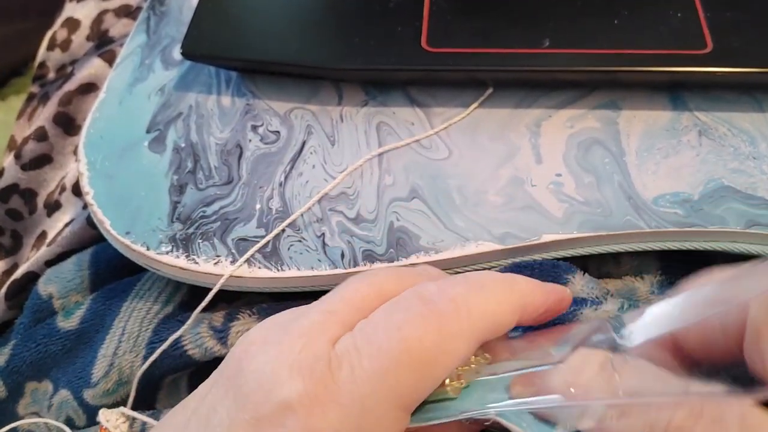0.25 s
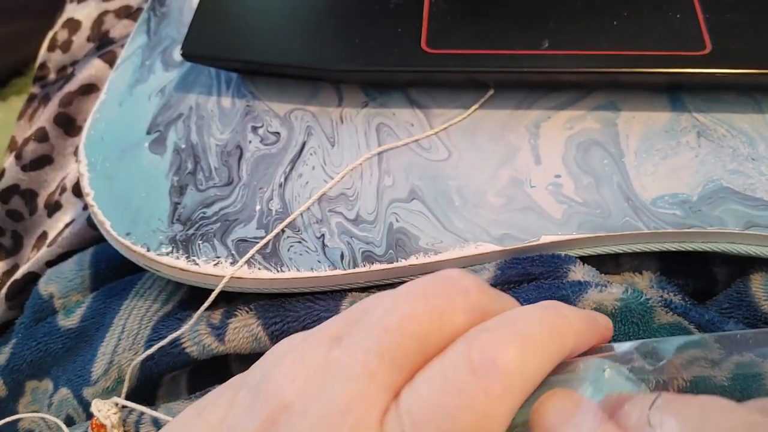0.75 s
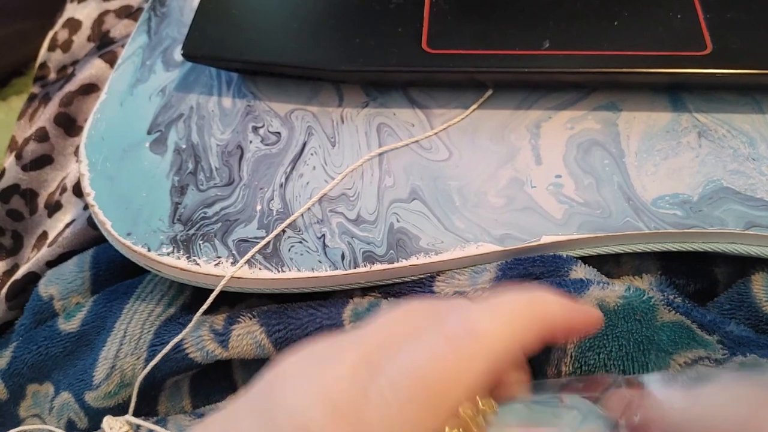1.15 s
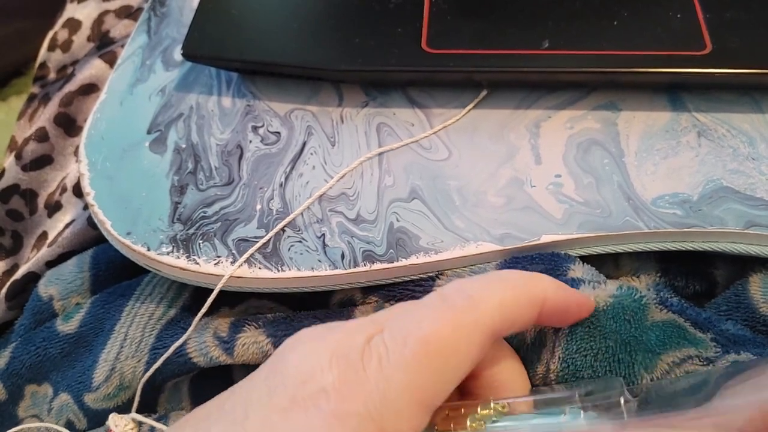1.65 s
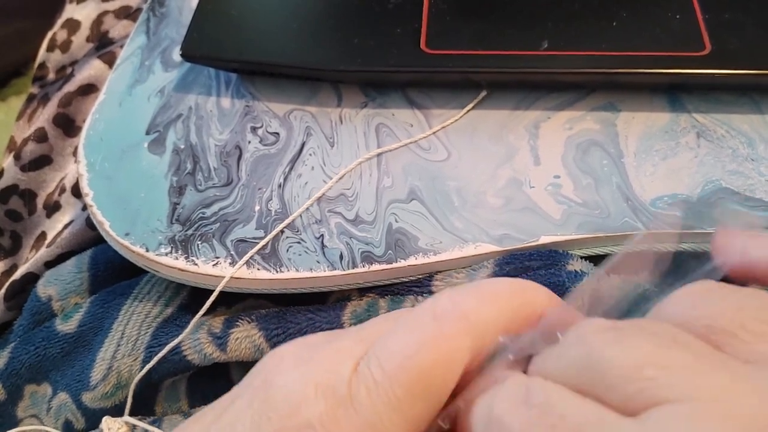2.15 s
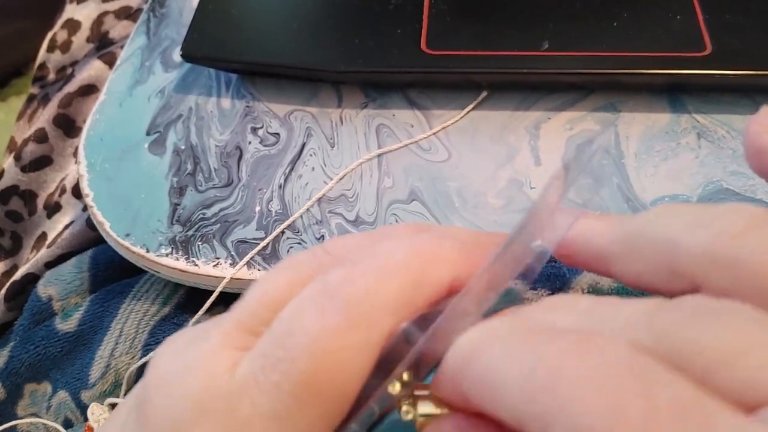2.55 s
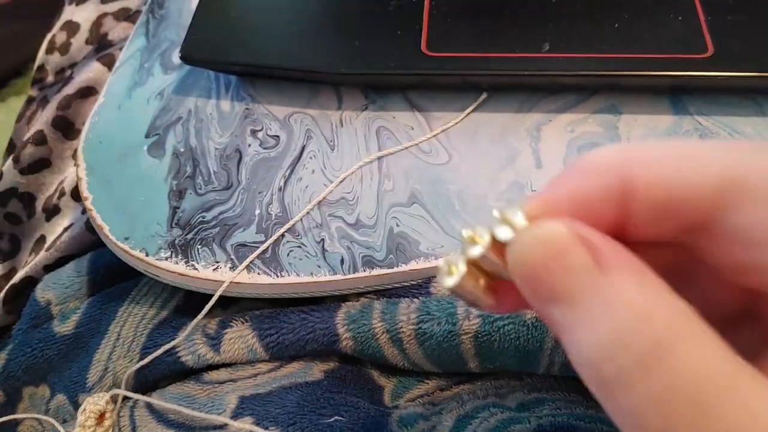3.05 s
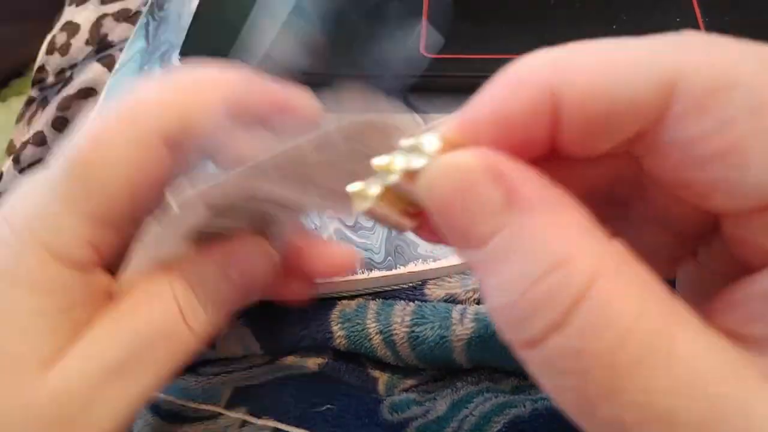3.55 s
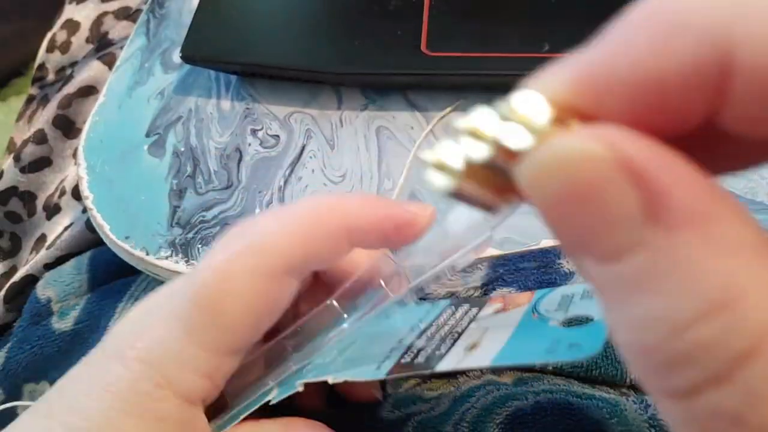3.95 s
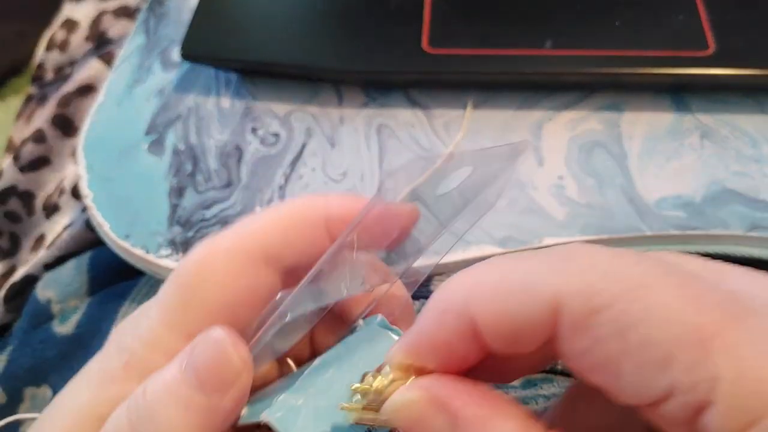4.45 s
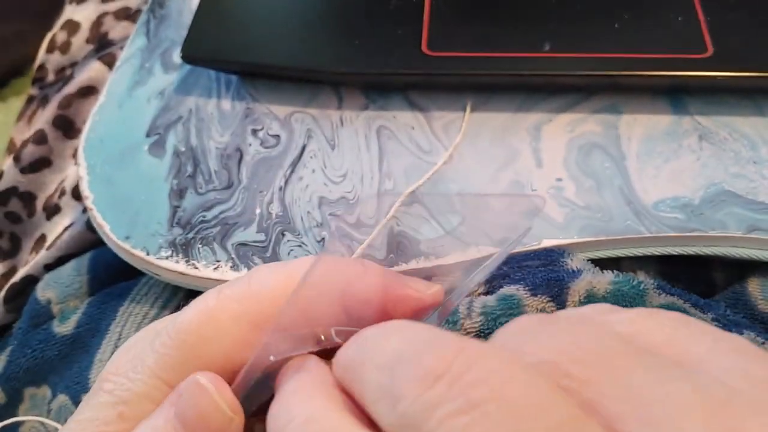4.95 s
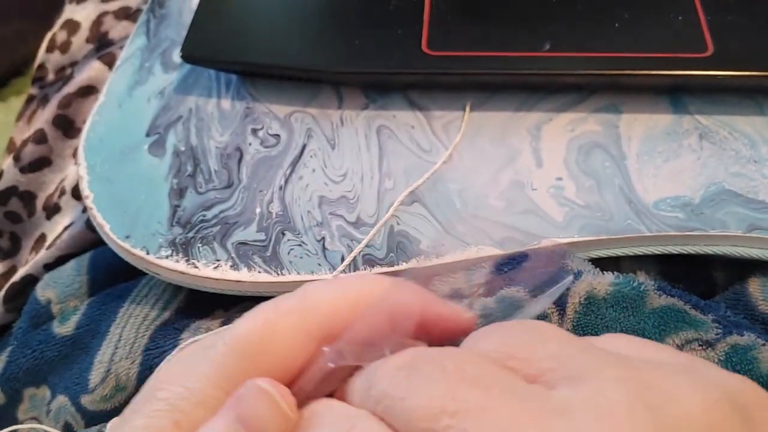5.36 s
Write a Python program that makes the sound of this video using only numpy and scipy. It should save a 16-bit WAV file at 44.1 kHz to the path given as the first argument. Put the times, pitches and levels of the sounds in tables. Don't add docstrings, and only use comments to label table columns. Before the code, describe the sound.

A close, dry stereo capture of hands working a stiff clear plastic sleeve in a quiet room, a faint wavering fan hum behind. It opens at once with a sharp crease snap, hissy finger rustle and fine ticks. From about 0.32 to 0.41 s a glued flap releases in a rapid ratchet of ticks with a tiny creak; a longer rising creak squeaks at 0.5-0.55. Hard snaps hit at 1.1 and, loudest and densest, around 1.3, with dull thumps and crunching. Further clusters come at 1.66-1.7, 2.3, 2.44 and 2.77-2.88, rustle between them. Around 3.0 small metal clasps give a very brief, bright tink at the left. Handling nearly stops until about 3.7, leaving fan hum and faint brushes. Then the clasps are pushed back in: softer rustles and small crackles, leaning left, one hard snap with a thump at 4.6, and busier crinkling from 5.2 to the end at about 5.6.

```python
import sys
import numpy as np
from scipy import signal
from scipy.fft import rfft, irfft, next_fast_len
from scipy.io import wavfile
from scipy.ndimage import uniform_filter1d, map_coordinates

SR = 44100
rng = np.random.default_rng(int(sys.argv[2]) if len(sys.argv) > 2 else 0)


def makeup_ratio(level_db):
    decades = np.asarray(level_db, float) / 20
    return 10 ** decades


def wav_out(sig):
    wavfile.write(sys.argv[1], SR, np.round(np.clip(np.atleast_2d(sig).T, -1, 1) * 32767).astype(np.int16))


N = 247401

# t/s, peak level/dB, colour f/Hz, thump level/dB, left over right level/dB
BIG_CREASES = [(.021, -11.5, 3730, -16, 0.5), (.2369, -27, 4120, -48, -6.5), (.4203, -17, 4250, -41, -3),
               (.4309, -12.5, 4730, -20, -3.5), (.6174, -22.5, 6600, -12, 4.5),
               (1.1115, -3.5, 10000, -10.5, 7), (1.1239, -16.5, 8400, -13, -4),
               (1.2485, -24.5, 2180, -22, 0), (1.261, -27, 4500, -22, -2.5),
               (1.2855, -29, 6400, -18.5, -2.5), (1.2993, 0.5, 7380, -12, 5),
               (1.3063, -2.5, 6400, -11.5, 6), (1.3076, -6.5, 2400, -6, 1.5),
               (1.3144, -26.5, 3600, -12, 4.5), (1.3253, -21, 1510, 1.5, 4.5), (1.343, -11, 3860, -9.5, 5),
               (1.6605, -16.5, 4270, -31, -3), (1.6628, -13, 3420, -16.5, 3), (1.6775, -21, 7600, -7, 2),
               (1.6984, -16, 5070, -25, 6), (1.6999, -27, 2350, -15.5, 1.5),
               (1.705, -15.5, 3000, -24.5, 8.5), (1.7102, -21, 3760, -5, 5.5),
               (2.298, -14.5, 6450, -16.5, -4.5), (2.2993, -12, 2760, -16, 2.5),
               (2.4356, -16, 7100, -40, 17), (2.4392, -5.5, 7400, -15.5, 1), (2.4403, -9, 6430, -4.5, 9.5),
               (2.7656, -15.5, 7900, -3.5, 8), (2.8357, -17, 2810, 0, 5.5), (2.8765, -19, 5840, -9.5, 2),
               (4.5928, -4.5, 7100, -31, 11), (4.5956, -13.5, 4220, -4, -3)]
# t/s, peak level/dB, colour f/Hz, left over right level/dB
DRY_TICKS = [(0.0422, -35, 2400, 10), (0.117, -24, 6400, 2), (0.2, -35, 4100, -4.5), (0.2202, -23, 6930, 1),
             (0.2237, -25, 6840, 4.5), (0.2304, -20.5, 6560, 9), (0.2416, -40, 6600, -14),
             (0.5554, -27.5, 4700, 3), (0.5617, -23.5, 4800, 7), (0.6775, -32.5, 4360, -8),
             (0.8013, -34, 7760, 5), (0.806, -45, 5000, 11), (0.8933, -38.5, 4700, 18),
             (0.9751, -26.5, 8400, 7), (0.9838, -37.5, 8200, 9), (1.008, -38, 5200, 5),
             (1.0337, -40, 5000, 9), (1.054, -28, 5280, 5), (1.09, -32, 3000, 10), (1.0983, -31.5, 5100, 8),
             (1.2727, -30.5, 8100, 12), (1.3298, -21.5, 6200, -14), (1.5589, -35, 3980, 7),
             (1.671, -15.5, 3610, -3), (1.8427, -44, 3020, 5), (1.9424, -29, 3000, 16),
             (1.9758, -27, 6400, 2.5), (2.0006, -44, 6840, 6), (2.3238, -25, 8100, 4),
             (2.6576, -39.5, 1680, 13), (2.6658, -30.5, 1750, 11), (2.6747, -29.5, 1600, 7.5),
             (2.7633, -18.5, 6100, 13), (2.8056, -27, 6800, 8.5), (2.818, -29, 6600, 11),
             (2.832, -13.5, 4800, 4.5), (2.8896, -34, 6200, 12.5), (3.7387, -41, 7000, 13.5),
             (4.2128, -48.5, 6230, 14), (4.4061, -38.5, 3430, 4), (4.4449, -38, 2340, 10),
             (4.5944, -7.5, 4280, 25), (4.813, -59, 8200, 13), (4.9566, -45, 2520, -2),
             (5.0092, -39.5, 2830, 17), (5.207, -39, 2540, 10), (5.2726, -30, 7960, 9),
             (5.3178, -28.5, 7150, 20), (5.3802, -29.5, 5150, -4)]
# f/Hz, level/dB per Hz
FILM_COLOUR = [(300, -12), (1200, 0), (2500, 0), (3500, -1), (5000, 0), (8300, 3), (9300, -7), (10200, -5),
               (11600, -0.5), (12300, -6.5), (12900, -18.5), (15400, -13), (16200, -41.5), (17000, -75.5)]


def unit(x):
    return x / np.sqrt(np.mean(x ** 2, axis=-1, keepdims=True) + 1e-20)


def along(points, hz):
    f, v = np.transpose(points)
    return np.interp(np.log(hz + 1), np.log(f + 1), v)


def wobble(rate):
    knots = rng.standard_normal(int(N * rate / SR) + 4)
    return map_coordinates(knots, [np.arange(N) * rate / SR])


def filtered(x, response):
    m = next_fast_len(x.shape[-1] + 2048)
    spectrum = rfft(x, m) * response(np.fft.rfftfreq(m, 1 / SR))
    return irfft(spectrum, m)[..., :x.shape[-1]]


def peak(hz, centre_hz, width_hz):
    return 1j * hz * width_hz / (centre_hz ** 2 - hz ** 2 + 1j * hz * width_hz)


def pair(shape, alike):
    a, b = rng.standard_normal((2, *shape))
    share = np.clip(alike, 0, 1)
    return np.array([a, share * a + np.sqrt(1 - share ** 2) * b])


def clumps(shape, depth_db, size):
    steps = rng.exponential(size=(*shape[:-1], shape[-1] // size + 1))
    held_steps = np.repeat(steps, size, axis=-1)[..., :shape[-1]]
    return makeup_ratio(depth_db * held_steps)


def film(x, colour_hz, sharpness):
    spread = .5 * rng.standard_normal((len(colour_hz), 4)) / np.sqrt(sharpness)
    rings_hz = colour_hz * np.exp(spread)

    def patch(hz):
        rings = 1.5 * sum(peak(hz, c[:, None], 160) for c in rings_hz.T)
        return 0.57 / sharpness + peak(hz, colour_hz, colour_hz / sharpness) * (1 + 1.8 * rings)

    return unit(filtered(x, lambda hz: makeup_ratio(along(FILM_COLOUR, hz)) * peak(hz, 5400, 48000) ** 4 * patch(hz)))


def sheet(x):
    return unit(filtered(x, lambda hz: peak(hz, 710, 1400) * peak(hz, 330, 1000)))


def laid_out(rows, starts):
    out = np.zeros((2, SR + N + rows.shape[-1]))
    for k, s in enumerate(starts):
        first = SR + round(s * SR)
        out[:, first:first + rows.shape[-1]] += rows[:, k]
    return out[:, SR:SR + N]


def creases():
    # t/s, peak level/dB, colour f/Hz, thump level/dB
    opening = [(0.0631, -27.5, 3840, -31), (0.109, -26.5, 6930, -29), (0.1191, -29, 1050, -37),
               (0.1762, -30.5, 3990, -42), (0.25, -26.5, 6400, -40), (0.546, -28, 7800, -30),
               (0.6958, -44, 5100, -25), (0.7194, -47, 5540, -14), (0.7927, -36.5, 5500, -31),
               (1.0173, -29.5, 7000, -14.5), (1.064, -25, 5890, -44), (1.3717, -20, 8200, -15),
               (1.4434, -23, 9170, -12.5), (1.535, -31.5, 6600, -2.5), (1.563, -28, 3240, -34),
               (1.607, -23, 5900, -6.5), (1.8493, -39.5, 2930, 6), (1.9814, -29.5, 5720, -7.5),
               (2.3417, -25, 7600, -25), (2.3525, -24, 9030, -12), (2.6424, -36, 3990, -25),
               (2.6591, -28.5, 2020, -5), (2.777, -35, 7620, -18), (2.927, -38, 7300, -13)]
    # t/s, peak level/dB, colour f/Hz, thump level/dB
    repacking = [(3.7317, -38, 6800, -3), (3.919, -34, 7000, -13.5), (3.9636, -35, 2160, -5),
                 (4.0342, -22.5, 2590, -17.5), (4.3171, -30, 5430, -10), (4.347, -38.5, 6080, -36.5),
                 (4.4013, -47.5, 2420, -10), (4.492, -34, 2950, -24), (4.58, -35, 4400, -10),
                 (4.65, -29.5, 4300, -19), (4.8006, -29.5, 8150, -16), (4.8179, -37, 7060, -40),
                 (4.862, -36, 6560, -17.5), (4.9373, -22.5, 2330, -11), (5.1045, -34, 7650, -11),
                 (5.1625, -38.5, 2300, -3.5), (5.2206, -45, 2600, -19), (5.2414, -25, 2540, -0.5),
                 (5.273, -26.5, 1600, -24), (5.3074, -27, 7000, -22), (5.3128, -36, 7900, -21.5),
                 (5.383, -22, 7270, -15), (5.39, -24, 7460, -12), (5.4154, -21, 6300, -9)]
    opening_pan_db, repacking_pan_db = 2, 8.5
    tick_thump_db = -21.5
    small = [(*r, opening_pan_db) for r in opening] + [(*r, repacking_pan_db) for r in repacking]
    dry_ones = [(s, db, hz, tick_thump_db, pan) for s, db, hz, pan in DRY_TICKS]
    return BIG_CREASES + small + dry_ones


def snaps():
    crack_hz, crack_db, crack_grows = 11060, -5.5, 0.24
    tick_sharp, tick_tail_db = 1.8, -2
    s, peak_db, colour_hz, thump_db, pan_db = (c[:, None] for c in np.transpose(creases()))
    index = np.arange(len(s))[:, None]
    lead = .012
    t = np.arange(SR // 9) / SR - lead
    after = np.maximum(t, 0)
    shape = (len(s), len(t))

    creep = makeup_ratio(-16.5 + 60 * np.minimum(t, 0) / 0.0035) * (t < 0)
    span = 0.00031 * makeup_ratio(0.042 * (peak_db + 25.0))
    rise = ((t - .0005) / span) ** 2
    fall = ((t - .0005) / (3.47 * span)) ** 2
    burst = np.exp(-np.where(t < .0005, rise, fall))
    thump = (after / (1.53 * span)) * np.exp(1 - after / (1.524 * span))
    decay = makeup_ratio(-12 - 60 * after / 0.035) + makeup_ratio(-25 - 60 * after / 0.17)
    scatter = (1 - np.exp(-after / 0.0015)) * decay

    slack = np.clip(5200 / colour_hz, 1, 3) ** (1.33 * (index >= len(BIG_CREASES)))
    taut = np.where(index < len(s) - len(DRY_TICKS), 1, tick_sharp)
    high = film(pair(shape, alike=0.074), colour_hz, sharpness=1.5 * slack * taut)
    crack = film(pair(shape, alike=0.11), np.full_like(colour_hz, crack_hz), sharpness=1.9)
    high = (high + makeup_ratio(crack_db + crack_grows * (peak_db + 16.5)) * crack / slack) * burst
    high /= np.sqrt(np.max(uniform_filter1d(high ** 2, size=30), axis=-1, keepdims=True))

    push = 3 * (1 - after / (0.77 * span)) * np.exp(-after / (0.41 * span)) * np.tanh(after / 0.00044)
    low = makeup_ratio(thump_db) * (sheet(pair(shape, alike=0.044)) * (thump + scatter) + push)
    tail = film(pair(shape, alike=0.062), colour_hz, sharpness=0.1 * slack ** 2) * (scatter + creep)
    tail[:, -len(DRY_TICKS):] *= makeup_ratio(tick_tail_db)
    side = np.array([0 * pan_db, 1.5 - pan_db])
    dull = lambda hz: 1 / (1 + 1j * hz * (slack - 1) / 9000) ** 2
    rows = makeup_ratio(peak_db - 6.0) * (makeup_ratio(side) * (high + low) + tail)
    return laid_out(filtered(rows, dull), s[:, 0] - lead)


def crunches():
    # t/s, length/s, level/dB, colour f/Hz, thump level/dB
    dense_runs = [(0.0, 0.034, -38, 4190, -7), (0.099, 0.026, -40, 3440, -16),
                  (0.662, 0.021, -30.5, 5500, -18.5), (0.838, .016, -33.5, 6160, -46),
                  (1.093, 0.03, -43.5, 4890, -4.5), (1.291, .012, -30.5, 5980, -4),
                  (1.309, 0.045, -25, 2413, -2.5), (1.653, .008, -41, 3050, -22),
                  (1.656, .024, -27.5, 3420, -16), (1.695, .015, -26.5, 2840, -21),
                  (2.298, 0.03, -36, 5920, -10), (2.763, 0.018, -35, 5940, -10),
                  (2.797, 0.044, -43, 7120, -24), (2.828, 0.014, -36.5, 5780, -5),
                  (4.603, 0.02, -39, 7400, -3), (4.639, 0.0205, -43.5, 3396, -8.5),
                  (5.216, 0.077, -48, 3225, -5), (5.236, 0.025, -38.5, 1725, -2.5),
                  (5.412, .013, -46.5, 5460, -12)]
    # t/s, length/s, level/dB, colour f/Hz
    squeaks = [(0.829, 0.023, -48, 1200), (1.924, 0.034, -43, 2720), (2.587, 0.048, -50.5, 2460),
               (4.478, 0.015, -46, 2800), (5.2, 0.011, -45, 2500), (3.8, 0.028, -58, 1980),
               (0.04, 0.024, -47, 1550)]
    crunch_sharp, squeak_sharp, squeak_thump_db = .65, 4.5, -24
    rows = [(*r, crunch_sharp) for r in dense_runs]
    rows += [(*r, squeak_thump_db, squeak_sharp) for r in squeaks]
    s, length, level_db, colour_hz, thump_db, sharpness = (c[:, None] for c in np.transpose(rows))
    t = np.arange(SR // 5) / SR
    shape = (len(s), len(t))
    run = (1 - np.exp(-t / 0.0016)) * makeup_ratio(-5 * t / length) / (1 + (t / length) ** 12)
    trail = makeup_ratio(-19.5 - 60 * np.maximum(t - length, 0) / 0.11) * (t > length / 2)
    slips = unit(clumps(shape, depth_db=2.0, size=40))
    high = film(pair(shape, alike=0.2), colour_hz, np.maximum(sharpness, .3)) * (slips * run + trail)
    low = makeup_ratio(thump_db) * sheet(pair(shape, alike=0.26)) * (run + trail)
    return laid_out(makeup_ratio(level_db) * (high + low), s[:, 0])


def grains(count, life_s):
    start, pitch, size = rng.random((3, count, 1))
    k = np.arange(120)
    tone = np.sin(2 * np.pi * (1200 + 14000 * pitch) * k / SR)
    ring = tone * np.exp(-k / SR / life_s) * (1 - np.exp(-k / 8))
    ring = ring * makeup_ratio(-2.6 * np.log(size + 1e-2))
    places = (start * N).astype(int) + k
    return unit(np.bincount(places.ravel(), ring.ravel(), N + len(k))[:N])


def strokes(t):
    # t/s, swell/s, fade/s, peak level/dB, patch f/Hz
    pulls = [(0.0, 0.06, 0.32, -42.5, 3240), (.239, 0.077, 0.031, -36.5, 6150),
             (.313, 0.054, 0.028, -43, 6550), (.445, 0.2, 0.19, -40.5, 4800),
             (.535, 0.069, 0.03, -31.5, 9700), (0.676, 0.1, 0.034, -36.5, 5740),
             (.846, 0.1, 0.12, -47.5, 4800), (.99, 0.056, 0.22, -53.5, 7740),
             (1.06, 0.015, 0.099, -39.5, 5550), (1.134, 0.093, 0.03, -38.5, 4900),
             (1.265, 0.022, 0.16, -32, 12900), (1.564, 0.1, 0.053, -40.5, 3800),
             (1.716, 0.14, 0.057, -42.5, 2230), (1.821, 0.59, 0.19, -53, 2630),
             (1.942, 0.026, 0.12, -44.5, 7100), (2.078, 0.08, 0.021, -38.5, 8400),
             (2.222, 0.031, 0.074, -56, 6470), (2.29, 0.03, 0.03, -53.5, 6800),
             (2.354, 0.11, .022, -38.5, 9570), (2.443, 0.023, 0.05, -35, 4770),
             (2.638, 0.15, 0.11, -42, 6900), (2.839, 0.16, 0.1, -37.5, 7000),
             (3.013, 0.029, 0.04, -61, 11960)]
    # t/s, swell/s, fade/s, peak level/dB, patch f/Hz
    pushes = [(3.3, 0.056, .03, -69.5, 4000), (3.381, .012, .03, -52.5, 4040),
              (3.443, 0.0054, .08, -64.5, 8200), (3.51, 0.13, .016, -60, 11500),
              (3.553, 0.0055, .018, -55.5, 5000), (3.625, 0.0082, 0.15, -50, 7000),
              (3.722, 0.008, .16, -48, 8200), (3.919, 0.06, .1, -57, 7140), (4.033, 0.14, .05, -44.5, 3930),
              (4.21, .03, 0.27, -52.5, 7200), (4.363, 0.14, 0.046, -50.5, 5590),
              (4.492, 0.035, 0.053, -44.5, 7000), (4.598, 0.038, .07, -36.5, 8840),
              (4.724, .05, .2, -52.5, 3600), (4.863, 0.1, .087, -47, 6565), (4.956, 0.03, .1, -52.5, 4300),
              (5.01, .05, .07, -51, 7490), (5.065, .03, .03, -52.5, 6840), (5.12, .03, .04, -59, 5000),
              (5.17, .03, .05, -59.5, 5000), (5.254, 0.067, .08, -36, 9300),
              (5.385, 0.025, .064, -48, 9560), (5.504, 0.039, 0.055, -44, 6570),
              (5.535, 0.07, 0.052, -40.5, 6600), (5.608, 0.125, .1, -51, 7000)]
    still_db, roundness = -77, 1.08
    s, swell, fade, peak_db, patch_hz = (c[:, None] for c in np.transpose(pulls + pushes))
    distance = np.abs((t - s) / np.where(t < s, swell, fade))
    each_db = peak_db - 20 * distance ** roundness
    effort_db = 10 * np.log10(np.sum(makeup_ratio(each_db) ** 2, axis=0) + makeup_ratio(still_db) ** 2)
    return effort_db, patch_hz[each_db.argmax(axis=0), 0]


def rustle():
    # t/s, left over right level/dB
    hands_pan = [(0, -5.5), (.9, -1), (1.6, -1), (2.5, 3.5), (3.5, 5.5), (5.6, 4)]
    bright_db, brighter = -1.5, 0.083
    drag = unit(pair((N,), alike=0.071) * clumps((N,), depth_db=2.4, size=30))
    z = signal.stft(makeup_ratio(-4.0) * drag + grains(count=40000, life_s=0.0014), nperseg=256)[2]
    field = uniform_filter1d(rng.standard_normal(z.shape[1:]), size=3, axis=0)
    field = uniform_filter1d(field, size=22, axis=1)
    hz = np.linspace(1, SR / 2, len(z[0]))[:, None]
    frames = np.arange(z.shape[2]) * 128 / SR
    level_db, patch_hz = strokes(frames)

    tilt_db = (bright_db + brighter * (level_db + 50.5)) * np.clip(np.log2(hz / 5000), -3, 2)
    colour_db = along(FILM_COLOUR, hz) + tilt_db
    ringing = 1 + 2.2 * np.abs(peak(hz, patch_hz, 500))
    gain = makeup_ratio(colour_db) * ringing * hz ** 2 / (hz ** 2 + 1100 ** 2)
    gain = gain / np.sqrt(np.mean(gain ** 2, axis=0))
    hiss = unit(signal.istft(z * gain * makeup_ratio(4.0 * field / field.std()), nperseg=256)[1][:, :N])

    t = np.arange(N) / SR
    pan_db = np.interp(t, *np.transpose(hands_pan))
    effort_db = np.interp(t, frames, level_db) - 5.5 + 3.2 * wobble(40)
    return makeup_ratio(effort_db) * makeup_ratio([0 * pan_db, -pan_db]) * hiss


def notches():
    # t/s, peak level/dB
    releases = [(0.319, -27), (0.328, -20), (0.343, -21.5), (0.3589, -26.5), (0.3662, -19.5),
                (0.3746, -21.5), (0.3844, -24), (0.3934, -21), (.4007, -22.5), (0.4113, -20.5)]
    flap_hz, flap_width_hz, ring_t60_s, pop_level = 7000, 12000, 0.0094, 0.63
    s, peak_db = np.transpose(releases)
    t = np.arange(SR // 50) / SR
    flap = lambda hz: makeup_ratio(along(FILM_COLOUR, hz)) * peak(hz, flap_hz, flap_width_hz) ** 2
    ring = unit(filtered(pair((len(s), len(t)), alike=.2), flap))
    ring = ring * makeup_ratio(-60 * t / ring_t60_s) * (1 - np.exp(-t / 0.00051))
    has_pop = np.abs(s[:, None] - .36) < .038
    pop = pop_level * np.exp(-((t - .0003) / .00009) ** 2) * has_pop
    return laid_out(makeup_ratio(peak_db)[:, None] * np.array([ring[0] + pop, ring[1]]), s)


def creaks():
    # t/s, rate/slips per s, level/dB
    slides = [
        [(.303, 460, -47), (.311, 430, -41), (.317, 370, -33), (.318, 400, -47)],
        [(.49, 365, -58), (.5, 540, -33.5), (.51, 425, -26.5), (.525, 700, -32.5), (.535, 1210, -35),
         (.548, 870, -38), (.552, 1700, -61)],
    ]
    # f/Hz, width/Hz, level/dB
    fold_rings = [(1600, 700, -8.5), (4800, 710, -2), (6400, 280, -3.5), (9900, 740, -1)]
    t, slips = np.arange(N) / SR, np.zeros(N)
    for rows in slides:
        s, rate, level_db = np.transpose(rows)
        pace = np.interp(t, s, rate, left=0, right=0) * (1 + .13 * wobble(300))
        passed = np.floor(np.cumsum(pace) / SR)
        slip_db = np.interp(t, s, level_db) + 1.3 * rng.standard_normal(N)
        slips += np.diff(passed, prepend=0) * makeup_ratio(slip_db)
    blur = makeup_ratio(-25 - 60 * t[:SR // 40] / .02) * pair((SR // 40,), alike=.3)
    blur[:, 0] = 1

    def fold(hz):
        rings = sum((-1) ** k * makeup_ratio(db) * peak(hz, c, w) for k, (c, w, db) in enumerate(fold_rings))
        return makeup_ratio(along(FILM_COLOUR, hz)) * peak(hz, 2400, 30000) ** 2 * rings

    return makeup_ratio(32.0) * filtered(signal.fftconvolve(slips[None], blur, axes=1)[:, :N], fold)


def panels():
    # t/s, length/s, level/dB, ring f/Hz
    bends = [(0.016, 0.015, -32, 3690), (0.223, 0.016, -35, 4100), (4.935, 0.0074, -41, 2420),
             (1.3, .008, -24, 2453), (1.524, 0.017, -49, 2595), (1.558, 0.026, -53, 1695),
             (1.657, 0.016, -24, 3820), (1.696, 0.0066, -27.5, 2370), (2.295, 0.011, -31, 2695),
             (2.297, 0.0084, -33, 4260), (2.437, 0.011, -29, 6425), (3.915, 0.0083, -51.5, 2420),
             (3.937, 0.063, -62, 4100), (3.937, 0.076, -59, 2100), (4.486, 0.013, -50, 1350),
             (4.587, 0.022, -41, 7160)]
    s, length, level_db, ring_hz = (c[:, None] for c in np.transpose(bends))
    t = np.arange(SR // 6) / SR
    noise = pair((len(s), len(t)), alike=0.32)
    ring = unit(filtered(noise, lambda hz: peak(hz, ring_hz, 160) ** 2))
    hold = (1 - np.exp(-t / 0.0007)) / (1 + (t / length) ** 4)
    return laid_out(makeup_ratio(level_db) * ring * hold, s[:, 0])


def bumps():
    # t/s, level/dB, f/Hz
    pokes = [(0.118, -46.5, 220), (0.1156, -19, 1020), (1.1118, -6, 1070), (1.325, -25, 940),
             (1.342, -30, 885), (1.357, -24, 444), (1.699, -26, 486), (1.84, -27.5, 648), (1.936, -39, 344),
             (2.836, -22, 785), (4.317, -48, 243), (4.596, -45, 916), (4.598, -8, 1170), (4.598, -38, 256),
             (4.902, -35.5, 332), (5.243, -40, 970)]
    cycles, rise_s, far_db = 4, 0.0026, 1.5
    s, level_db, hz = (c[:, None] for c in np.transpose(pokes))
    t = np.arange(SR // 20) / SR
    ring = makeup_ratio(level_db - 20 * t * hz / cycles) * np.sin(2 * np.pi * hz * t) * (1 - np.exp(-t / rise_s))
    return laid_out(np.array([ring, makeup_ratio(far_db) * ring]), s[:, 0])


def clasps():
    # t/s, level/dB
    touches = [
        (2.9985, -47.5),
        (3.0079, -27.5),
        (3.024, -39.5),
    ]
    # f/Hz, level/dB, t60/s
    modes = [(6600, -2, 0.0064), (8200, -6, 0.0077), (11500, 16, 0.0035), (12100, -2, 0.013)]
    s, level_db = np.transpose(touches)
    t = np.arange(SR // 20) / SR
    jolt_db = rng.normal(0, 2.6, (len(s), len(modes)))
    ring = 0
    for k, (hz, db, t60) in enumerate(modes):
        ring = ring + makeup_ratio(db + jolt_db[:, [k]] - 60 * t / t60) * np.sin(2 * np.pi * hz * t)
    ring = makeup_ratio(level_db)[:, None] * ring * (1 - np.exp(-t / 0.00021)) ** 2
    return laid_out(np.array([ring, makeup_ratio(-21) * ring]), s)


def fan():
    # t/s, middle ducts level/dB, upper ducts level/dB
    shading = [(0, -70.5, -70), (1.002, -65.5, -67), (2.2, -61.5, -64.5), (2.64, -65, -63),
               (3.201, -60.5, -73.5), (3.4, -64.5, -67), (3.6, -66, -79), (3.78, -61.5, -62.5),
               (4.2, -63.5, -60.5), (4.797, -62, -60.5), (5.6, -62, -66)]
    # f/Hz, width/Hz, level/dB
    ducts = [(75, 26, -10), (232, 70, -11.5), (424, 66, -9.5), (596, 83, -15), (756, 35, -8.5),
             (868, 30, -5.5), (947, 44, -2), (1117, 40, -2.5), (1170, 40, -10), (1390, 130, -21.5),
             (1670, 51, -23)]
    # f/Hz, level/dB per Hz
    hiss_colour = [(710, -32), (1200, -6), (1890, -13), (2730, -4.5), (7490, -12), (9510, -20),
                   (11700, -11), (16000, -21.5)]
    s, *levels_db = np.transpose(shading)
    middle_db, upper_db = (np.interp(np.arange(N) / SR, s, v) for v in levels_db)
    lower_db = -65.5 + 0.35 * (middle_db + 67)
    air = unit(pair((N,), alike=0.84))
    hum = np.zeros((2, N))
    for k, (c, w, db) in enumerate(ducts):
        shade_db = upper_db if c > 1030 else middle_db if c > 600 else lower_db
        level = makeup_ratio(db + shade_db + 3 * wobble(7.1))
        hum += (-1) ** k * level * filtered(air, lambda hz: peak(hz, c, w))
    drift = np.arange(N) + SR * .0025 * wobble(5)
    hum = np.array([np.interp(drift, np.arange(N), side) for side in hum])
    hiss = unit(filtered(pair((N,), alike=0.23), lambda hz: makeup_ratio(along(hiss_colour, hz))))
    return makeup_ratio(28.0) * hum + makeup_ratio(-80.5) * hiss


def scene():
    # f/Hz, width/Hz, level/dB
    sleeve_body = [(1050, 95, -1.5), (1574, 180, -11), (2350, 480, -6), (4170, 400, -4.5)]
    # f/Hz, width/Hz, level/dB
    flap_body = [(1050, 61, 0), (1550, 140, -1), (2950, 200, 1), (4100, 300, 1)]
    regrip_s = .32
    touches = snaps() + crunches() + rustle()
    taut = np.clip((regrip_s - np.arange(N) / SR) * 20, 0, 1)
    held = lambda body: lambda hz: 1 + sum(makeup_ratio(db) * peak(hz, c, w) for c, w, db in body)
    touches = filtered(taut * touches, held(flap_body)) + filtered((1 - taut) * touches, held(sleeve_body))
    return touches + notches() + creaks() + panels() + bumps() + clasps() + fan()


def low_pass(x):
    return signal.sosfilt(signal.butter(12, 16650, fs=SR, output="sos"), x)


def record(dry):
    # f/Hz, level/dB
    far_colour = [(100, -0.5), (1000, -4.5), (4000, -3), (6500, -2.5), (9000, -2), (11000, -4.5),
                  (13000, -4), (16000, -7)]
    lag_s = .0041
    far = filtered(dry[1], lambda hz: makeup_ratio(along(far_colour, hz)) * np.exp(-2j * np.pi * hz * lag_s))
    both = filtered(np.array([dry[0], far]), lambda hz: (1j * hz / (1j * hz + 65)) ** 3)
    both = both / (1 + np.abs(both / .9) ** 4) ** (1 / 4)
    return low_pass(both)


dry = scene()
out = record(dry)
wav_out(out)
```